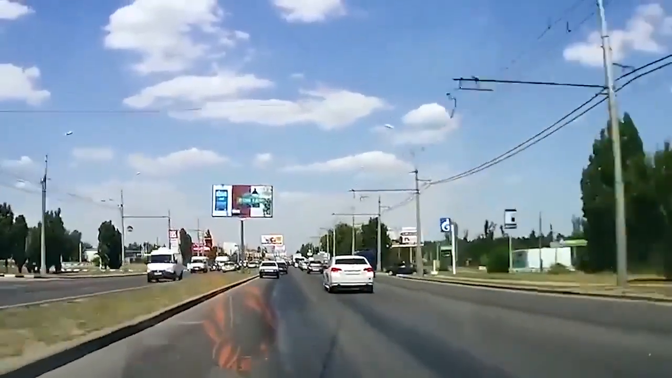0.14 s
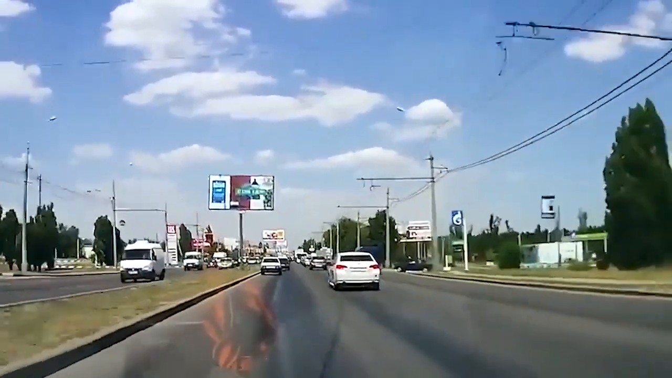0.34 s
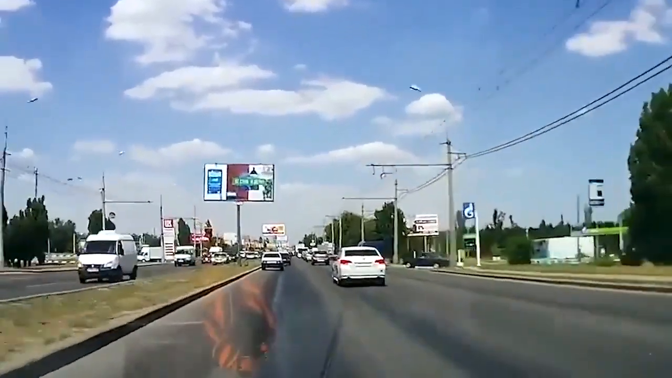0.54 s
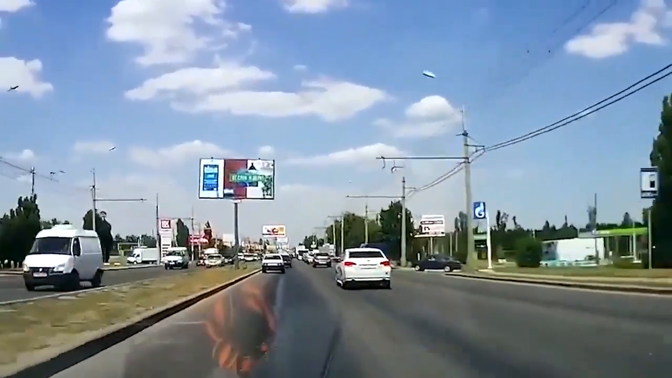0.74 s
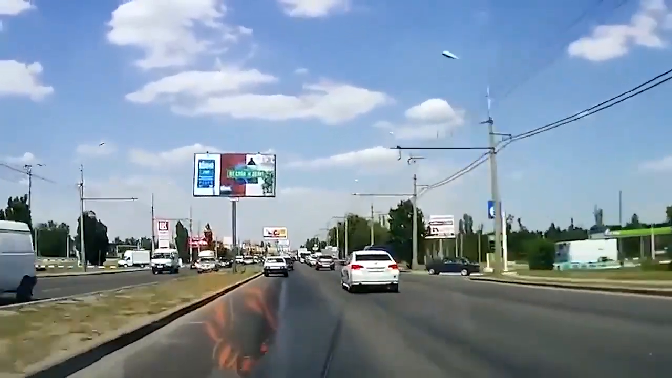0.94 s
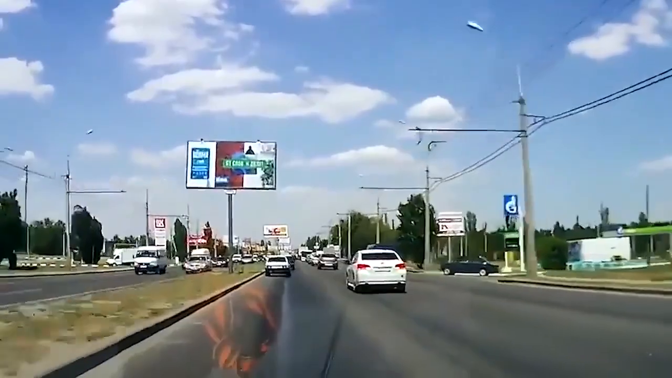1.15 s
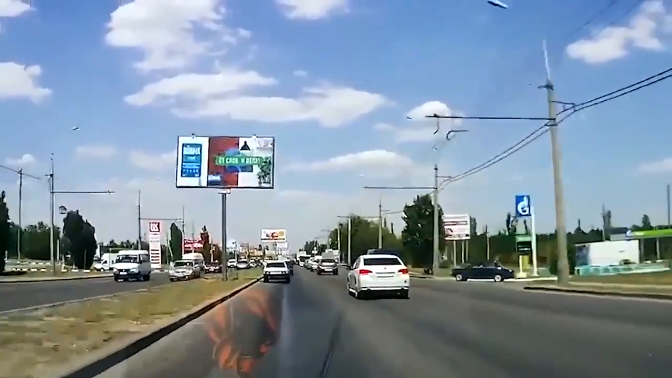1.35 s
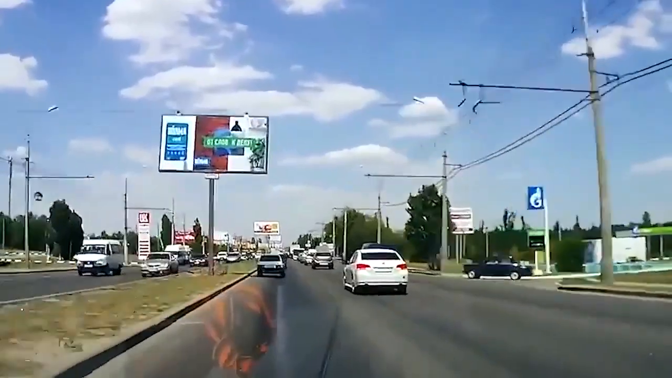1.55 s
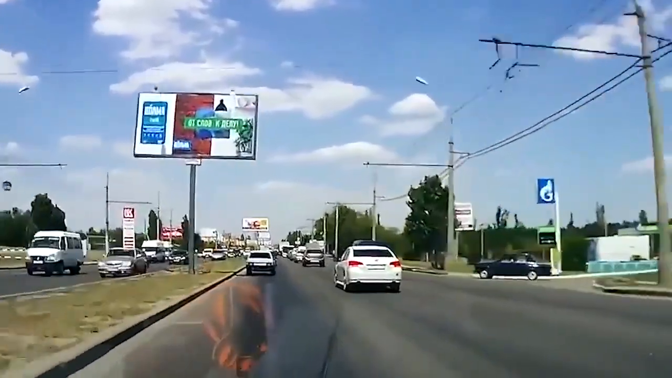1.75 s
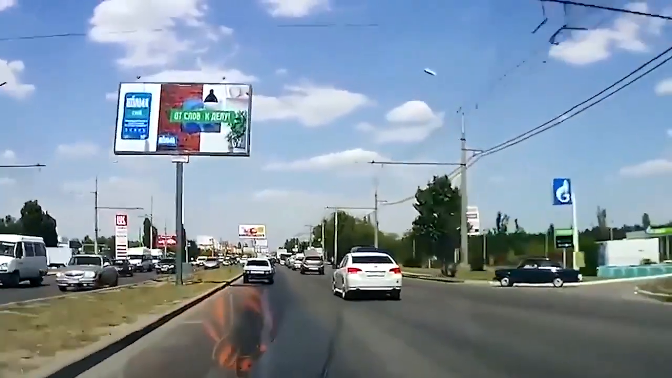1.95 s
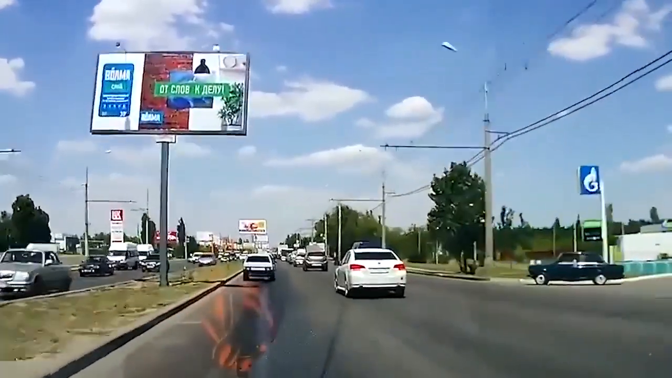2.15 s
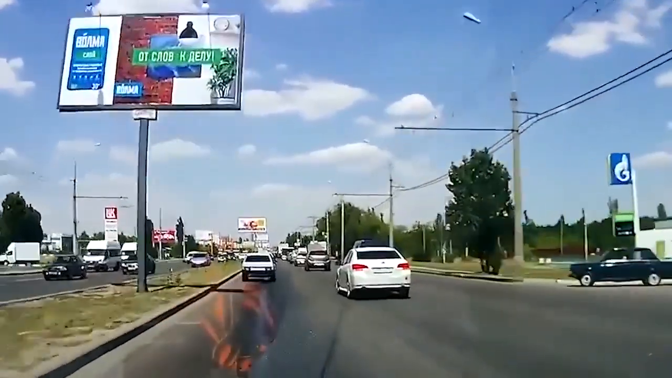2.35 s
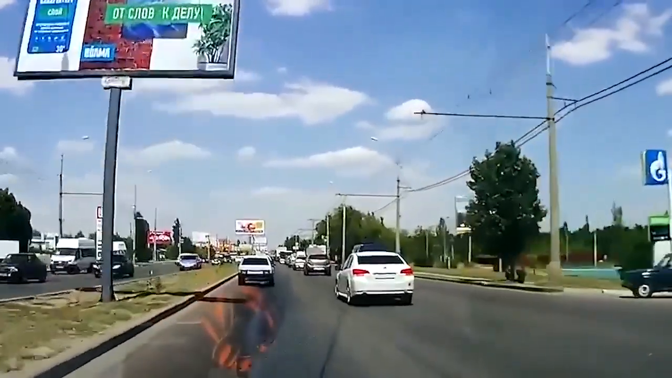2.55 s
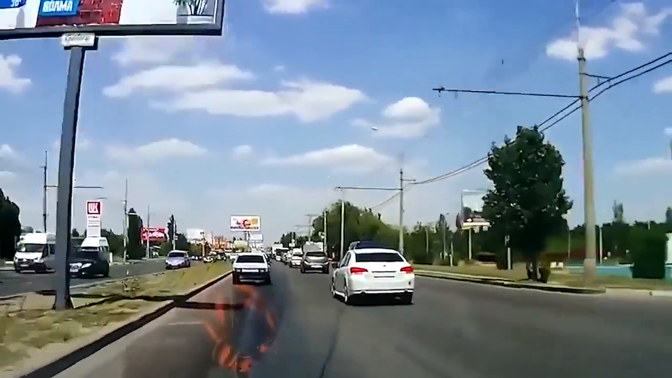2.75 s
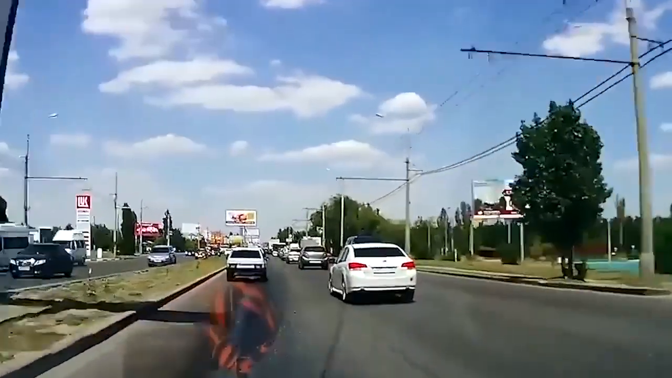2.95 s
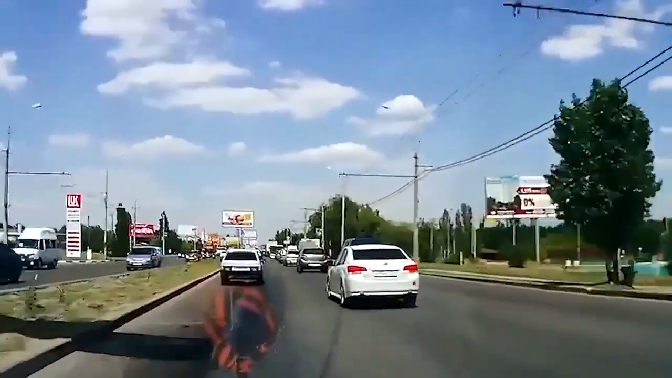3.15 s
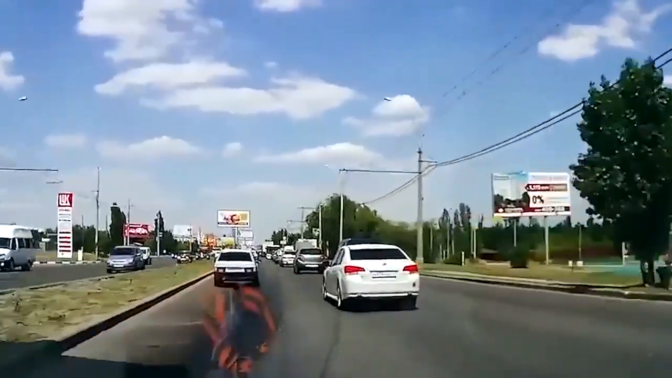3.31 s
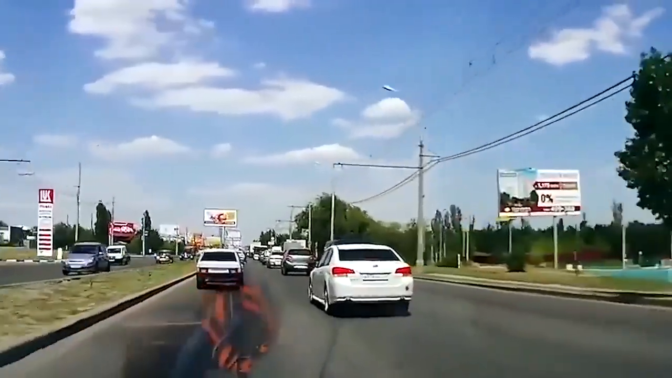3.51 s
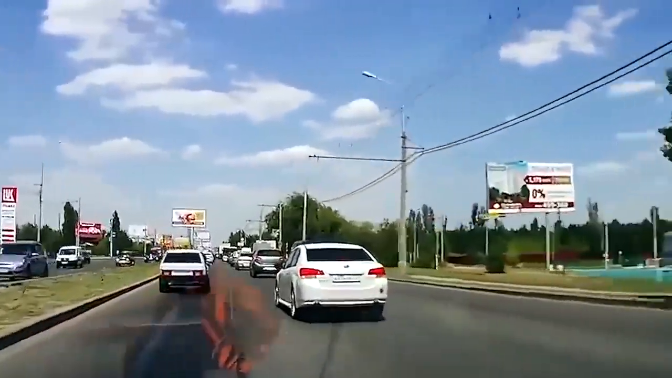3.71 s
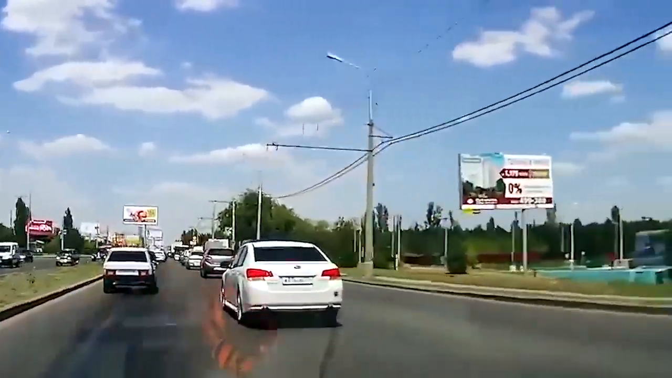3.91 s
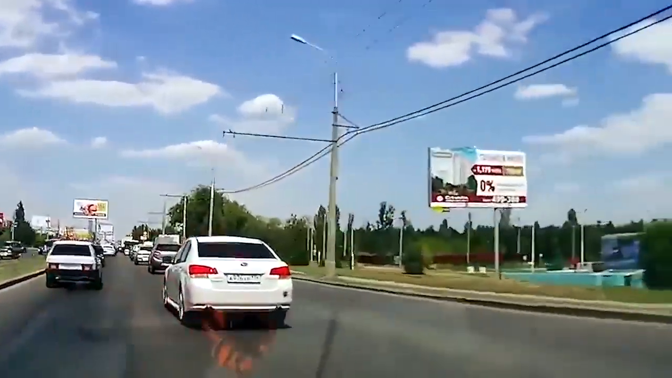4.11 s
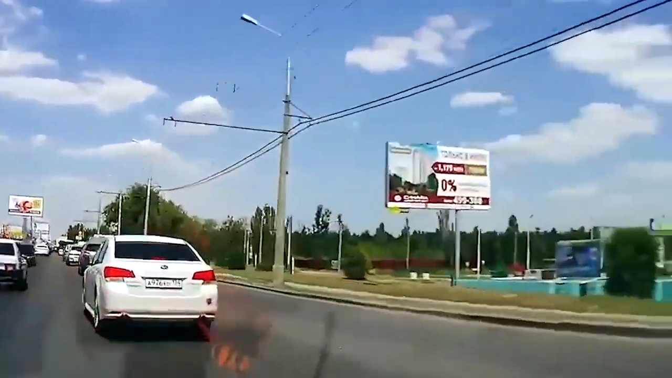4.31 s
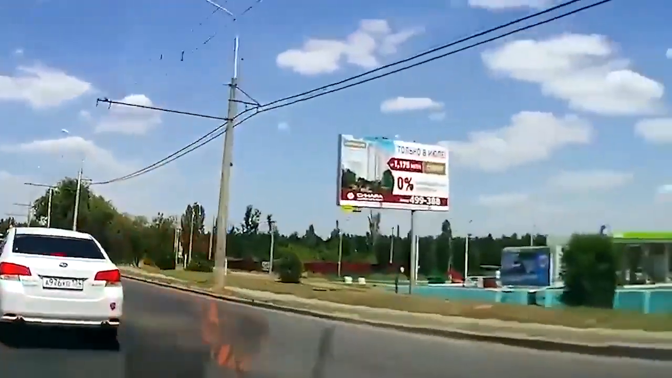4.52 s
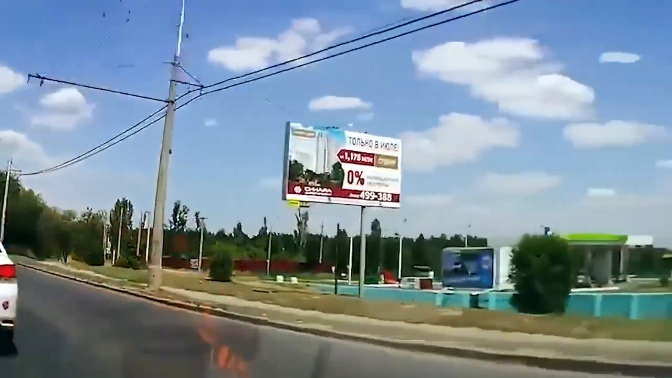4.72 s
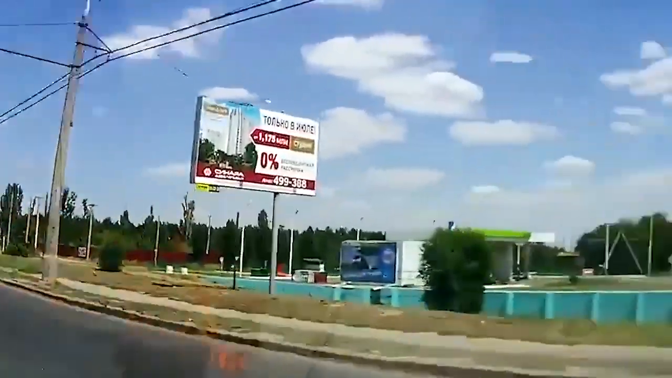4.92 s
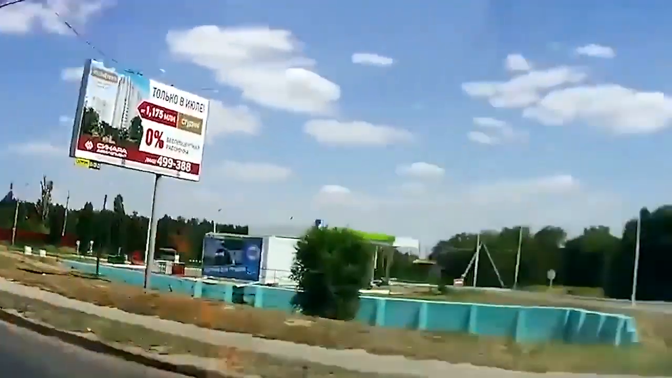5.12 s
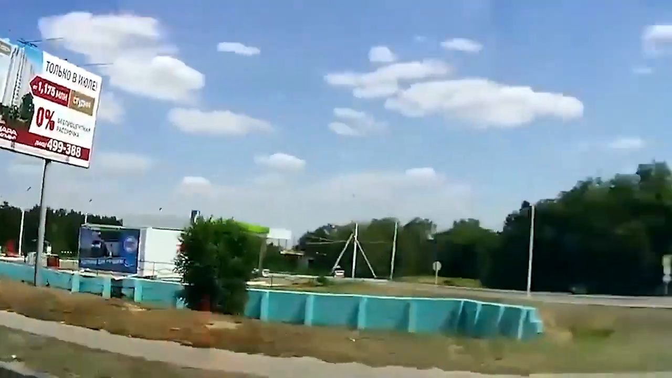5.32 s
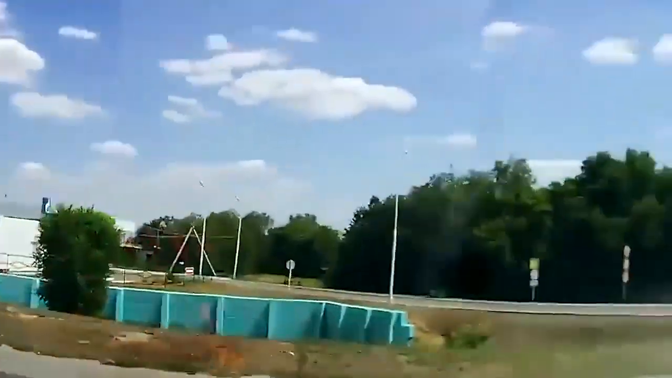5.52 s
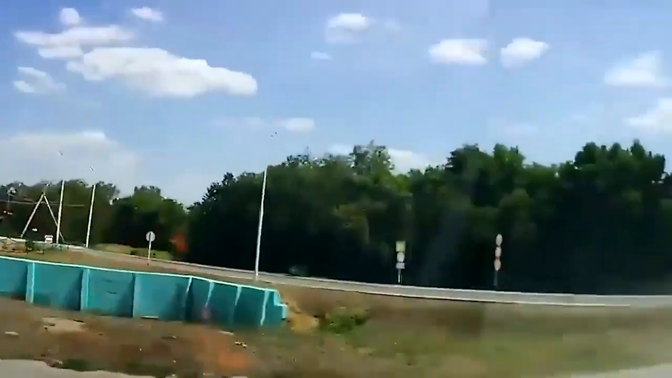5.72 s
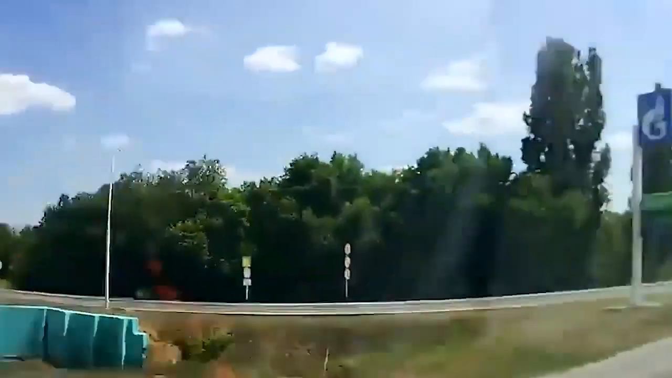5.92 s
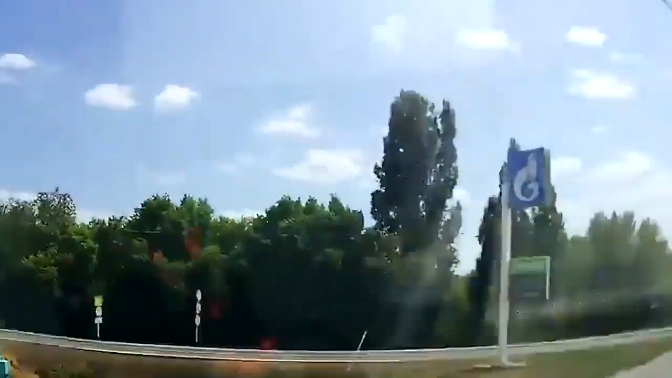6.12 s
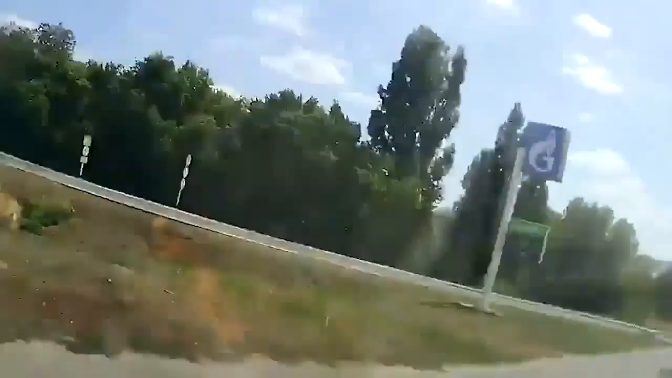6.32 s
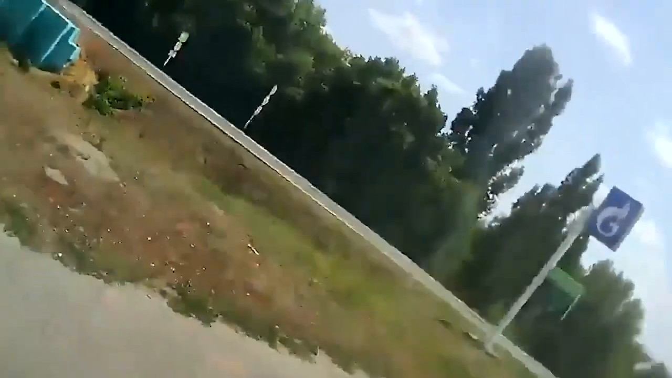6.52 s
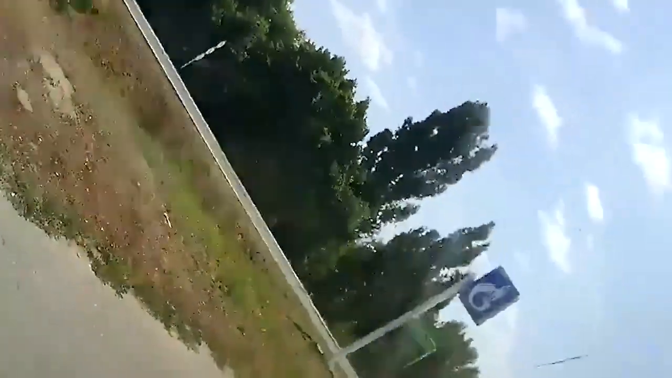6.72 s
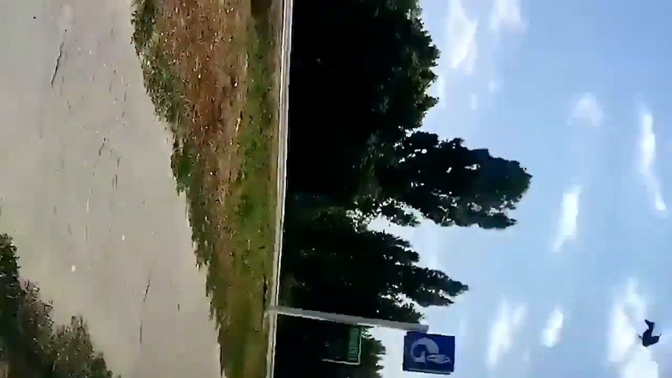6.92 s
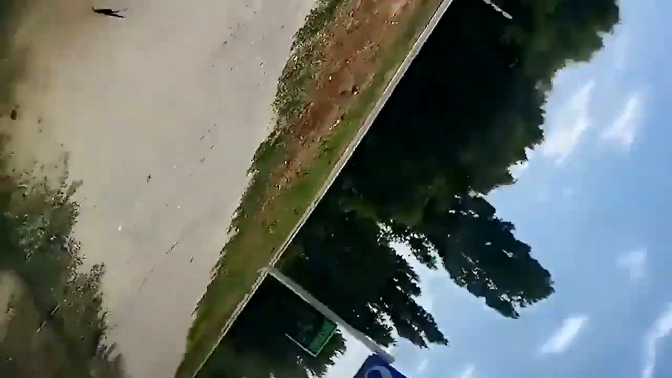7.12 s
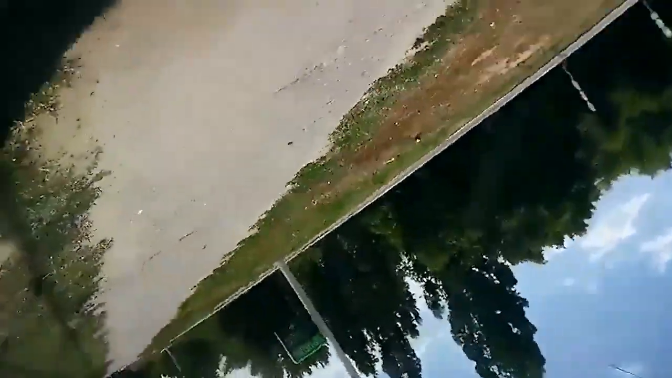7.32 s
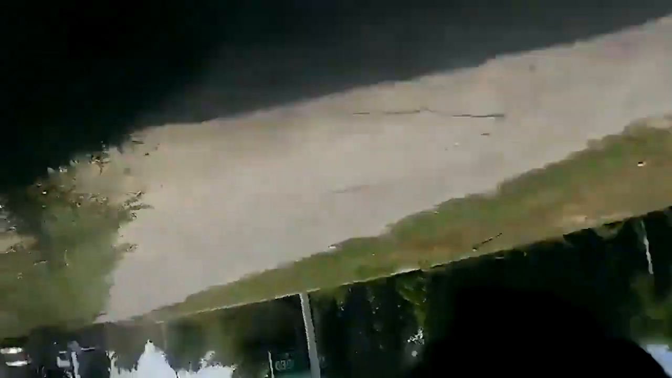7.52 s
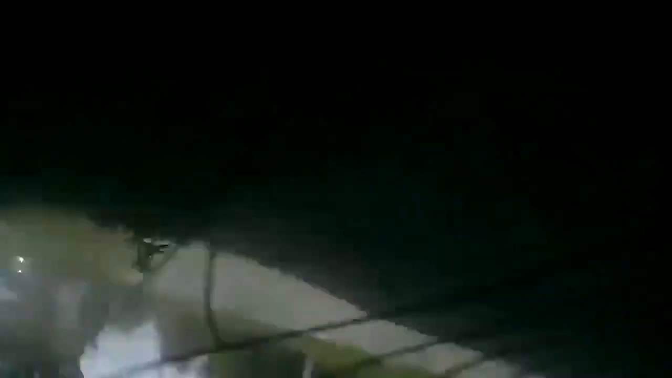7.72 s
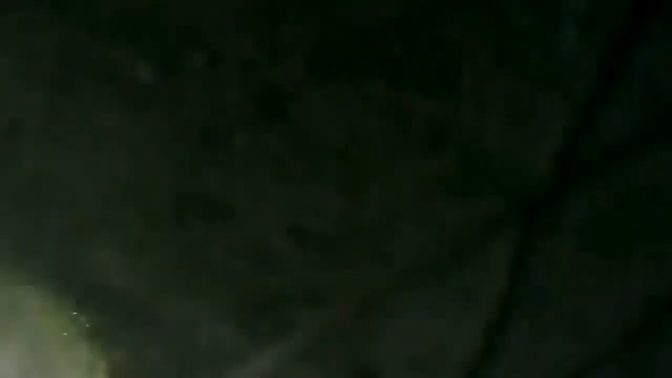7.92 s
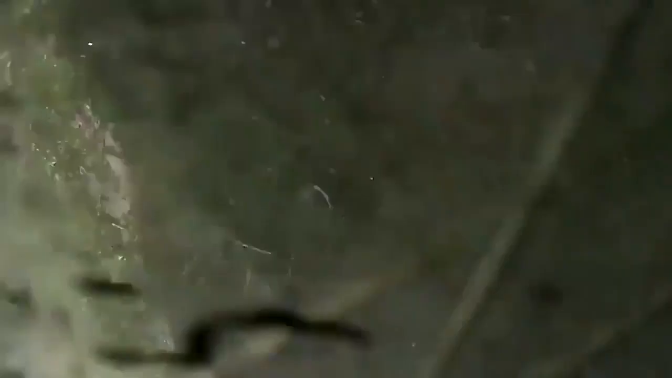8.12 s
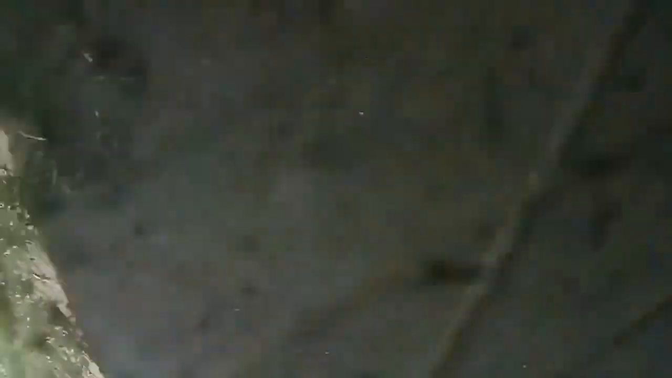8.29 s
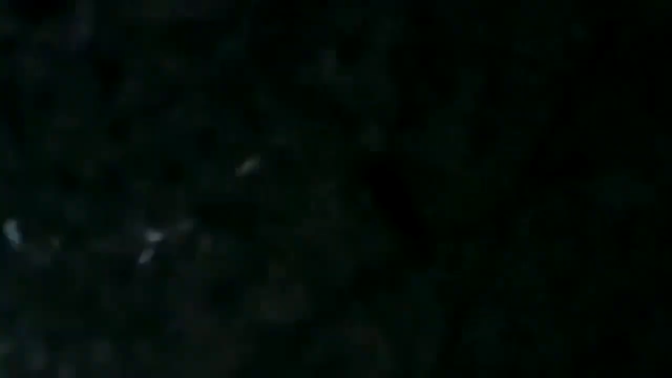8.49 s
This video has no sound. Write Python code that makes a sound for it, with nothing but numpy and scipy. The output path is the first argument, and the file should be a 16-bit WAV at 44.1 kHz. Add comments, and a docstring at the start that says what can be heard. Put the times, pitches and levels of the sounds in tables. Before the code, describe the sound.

A car interior at speed, low and rumbling, with muffled bumps and airy tread hiss. The tyres lose grip and squeal roughly, rising and falling in short surges, while trim rattles faintly. Two groups of dull body blows end the skid. A brief quieter groaning gap leads into a rapid rollover pile-up of bangs, buckling panels, clanking metal, debris and splintering glass, close and overloaded.

```python
"""Inside a car at speed: the body booms on its springs and the tyres roar, both from filtered noise.
It swerves and skids, with wavering harmonic tones for the squealing tyres, leaves the road and rolls over.
Decaying noise and panel modes make the blows on the shell; random contacts make the scraping metal;
short noise bursts make the breaking glass. A small dashboard microphone overloads on loud peaks."""
import sys
import numpy as np
from scipy import signal
from scipy.fft import rfft, irfft, next_fast_len
from scipy.io import wavfile
from scipy.ndimage import map_coordinates

SR = 44100
rng = np.random.default_rng(int(sys.argv[2]) if len(sys.argv) > 2 else 0)


def log_audio(samples):
    """Write samples as a 16-bit WAV file to the path given in sys.argv[1]."""
    # one column per channel
    frames = np.atleast_2d(samples).T
    # limit to full scale, then quantise
    limited = np.clip(frames, -1, 1)
    pcm = np.round(limited * 32767).astype(np.int16)
    wavfile.write(sys.argv[1], SR, pcm)


N = 377055
TIME = np.arange(N) / SR

# Table levels are relative: each layer may have its own trim in the mix.
# how hard the body is shaken: t/s, body boom level/dB, cabin drone level/dB
RIDE = [(0, -15.5, -23.5), (.5, -19.5, -28), (1.1, -17, -25.5), (1.7, -19.5, -28.5), (2.4, -18, -25),
        (3.1, -22, -23.5), (4.1, -18.5, -23.5), (4.7, -19, -27.5), (5.08, -14.5, -20.5), (5.8, -11.5, -21),
        (5.97, -19.5, -28), (6.3, -13, -22.5), (6.55, -11.5, -18), (6.76, -12.5, -22), (6.87, -18, -31),
        (7.3, -13.5, -23), (8.05, -12.5, -25), (8.18, -20, -25.5), (8.55, -15, -19)]
# rubber scrubbing sideways: t/s, level/dB
SCRUB = [(4.8, -41.5), (5.0, -37.5), (5.045, -29), (5.2, -31.5), (5.3, -31), (5.42, -21), (5.9, -22),
         (6.15, -25), (6.42, -23.5), (6.52, -36), (6.6, -64)]
# spectrum of the cabin drone and thuds: f/Hz, density/dB per Hz
DRONE = [(35, -30.5), (58, 2.5), (76, -5), (92, -3.5), (115, -10.5), (140, -21), (200, -24), (300, -26),
         (500, -29.5), (800, -35.5), (2000, -67.5), (5000, -115)]
# bright spectrum of rattling trim and of the clicks on jolts: f/Hz, density/dB per Hz
BRIGHT = [(1500, -20), (3500, 0.5), (5200, -2), (6500, -12), (8500, -10), (14000, -30.5)]
# spectrum of scraping and clanking metal: f/Hz, density/dB per Hz
SCRAPE = [(250, -21.5), (550, 0), (800, 1.5), (1100, -1.5), (1600, -2.5), (2100, -11.5), (2700, -8.5),
          (3400, -24), (4800, -19.5), (6200, -30.5), (15000, -36)]
# spectrum of breaking and dragged glass: f/Hz, density/dB per Hz
SHARDS = [(500, 0.5), (1500, -1), (2700, 3), (3300, -2.5), (4000, -0.5), (4800, 2), (6200, -9),
          (8400, -7.5), (11000, -14.5), (15000, -20)]


def amp(db):
    """Decibels to gain."""
    return 10 ** (np.asarray(db) / 20)


def unit(x):
    """Scale to rms 1."""
    return x / np.sqrt(np.mean(x ** 2) + 1e-20)


def level(rows, column=1):
    """Gain per sample from a dB column; it fades at 130 dB/s outside its rows."""
    s, db = np.transpose(rows)[[0, column]]
    outside = np.abs(TIME - np.clip(TIME, s[0], s[-1]))
    return amp(np.interp(TIME, s, db) - 130 * outside)


def envelope(s, length, attack, t60, t=TIME):
    """Gain at the times t: rise from s, hold until s + length, die away."""
    rise = np.clip((t - s) / attack, 0, 1)
    return rise * amp(-60 * np.maximum(t - s - length, 0) / t60)


def wobble(rate, size=N):
    """A smooth random curve, rate knots a second."""
    steps = np.arange(0, size * rate / SR + 1, 1 / 4)
    knots = rng.standard_normal(int(N * rate / SR) + 4)
    curve = map_coordinates(knots, [steps])
    return np.interp(TIME[:size] * rate, steps, curve)


def colour(x, points):
    """Causal minimum-phase filter through (Hz, dB) points."""
    size = 2 * next_fast_len(len(x) // 2 + 4096)
    f, db = np.transpose(points)
    gain = amp(np.interp(np.log(np.fft.rfftfreq(size, 1 / SR) + 1), np.log(f), db))
    # folding the cepstrum forward makes the response causal
    cepstrum = irfft(np.log(gain + 1e-6))
    cepstrum[1:size // 2] *= 2
    cepstrum[size // 2 + 1:] = 0
    response = np.exp(rfft(cepstrum))
    return irfft(rfft(x, size) * response)[:len(x)]


def noise(points, size=N):
    """Coloured noise of rms 1."""
    return unit(colour(rng.standard_normal(size), points))


def grains(rate, spread_db, size=N):
    """Random tiny contacts of uneven strength, rate a second on average, rms 1."""
    unevenness = np.clip(rng.standard_normal(size), -2, 2)
    strength = rng.standard_normal(size) * amp(spread_db * unevenness)
    return unit(strength * (rng.random(size) < rate / SR))


def add(track, s, sound):
    """Mix a sound in at s seconds."""
    start = round(s * SR)
    track[start:start + len(sound)] += sound[:max(N - start, 0)]


def cabin(x, t60, wet_db):
    """Windows and trim throw back a dense, short cloud of reflections."""
    t = TIME[:SR // 6]
    tail = rng.standard_normal(len(t)) * amp(-60 * t / t60) * (t > .001)
    echo = signal.oaconvolve(x, tail / np.linalg.norm(tail))[:len(x)]
    return (x + amp(wet_db) * echo) / np.hypot(1, amp(wet_db))


def blows():
    """Each blow thumps the body and buckles a panel: tiny snaps, and a hollow ring that sags as metal gives."""
    # blows on the shell: t/s, crunch level/dB, crunch centre f/Hz, t60/s, ring level/dB, panel f/Hz
    strikes = [(6.05, -20, 225, 0.17, -25, 198), (6.088, -15, 420, .12, -23, 292),
               (6.385, -16, 300, 0.2, -20, 338), (6.435, -12.5, 260, 0.22, -15.5, 224.5),
               (6.677, -33, 647, .2, -38, 593), (6.77, -18.5, 697, 0.21, -25, 603),
               (6.85, -17, 960, 0.12, -23.5, 899), (6.973, -28, 650, .08, -29, 590),
               (7.077, -20.5, 700, 0.1, -21.5, 692), (7.088, -18, 800, .1, -10.5, 208),
               (7.118, -15.5, 1000, 0.08, -15, 1603), (7.13, -19, 1000, 0.071, -12.5, 1387),
               (7.146, -12.5, 596, .1, -10, 755), (7.162, -9, 597, 0.079, -12, 792),
               (7.282, -15, 760, 0.062, -19, 930), (7.318, -21, 810, 0.16, -28, 800),
               (7.377, -14, 750, .14, -15, 814), (7.425, -16, 640, 0.13, -18.5, 677),
               (7.561, -21.5, 1080, .13, -19.5, 984), (7.648, -14, 610, .11, -22.5, 630),
               (7.679, -7.5, 428, .05, -2, 493), (7.686, -19, 300, 0.16, -11, 171),
               (7.749, -1.5, 450, .055, -6, 539), (7.767, -16.5, 410, 0.086, -5, 404.5),
               (7.782, -2.5, 430, .035, -3.5, 504), (7.808, -11, 500, 0.082, -3.5, 286.4),
               (7.811, -15, 600, .07, -7, 635), (7.824, -8, 460, 0.053, -8, 438),
               (7.841, -14, 706, .08, -20, 478), (7.878, -2.5, 600, .04, -8.5, 645),
               (7.889, -7, 610, 0.028, -17.5, 433), (7.908, -4, 942, 0.1, -14, 1094),
               (7.94, -12, 600, .08, -13, 560), (7.98, -15, 600, .06, -15.5, 723),
               (8.005, -12, 581, .09, -17.5, 350), (8.069, -20.5, 700, 0.049, -19, 752),
               (8.133, -4, 803, 0.049, -6.5, 779), (8.225, -9.5, 796, .1, -14.5, 1022),
               (8.456, -14.5, 600, .12, -25, 595), (8.512, -17, 700, .14, -23, 739)]
    # crunch spectrum: multiple of the crunch centre, density/dB per Hz
    crunch_shape = [(.1, -15.5), (.3, -2), (.6, -0.5), (1, -2.5), (1.4, -2.5), (2, -9), (3.5, -19),
                    (7, -30.5), (25, -62.5)]
    # what a panel rings with: multiple of its pitch, level/dB
    modes = [(.62, -11), (1, 0), (1.6, -12), (2.3, -14.5)]
    buckle_sag, mode_scatter = .03, .08  # share of the pitch lost; random scatter in the exponent of the multiple
    track, t = np.zeros(N), TIME[:SR // 3]
    ratio, mode_db = np.transpose(modes)[:, :, None]
    for s, crunch_db, crunch_hz, t60, ring_db, ring_hz in strikes:
        spectrum = [(crunch_hz * multiple, gain) for multiple, gain in crunch_shape]
        crunch = unit(colour(grains(3000, 2.6, size=len(t)), spectrum))
        modes_hz = ring_hz * ratio ** (1 + mode_scatter * rng.standard_normal(ratio.shape))
        sagging_hz = modes_hz * (1 - buckle_sag * np.minimum(t / t60, 1))
        phase = 2 * np.pi * np.cumsum(sagging_hz, axis=1) / SR
        ring = unit((amp(mode_db) * np.sin(phase)).sum(axis=0))
        decay = amp(-60 * t / t60) * (1 - np.exp(-t / 0.00061))
        panel = (amp(crunch_db) * crunch + amp(ring_db) * ring) * decay
        thump_hz = rng.normal(135, 13.0)
        thump = np.sin(2 * np.pi * thump_hz * t) * amp(crunch_db - 5 - 60 * t / (2 * t60))
        add(track, s, panel + thump)
    return track


def slide_level(column):
    """Gain of one layer of the sliding shell; where slides overlap the strongest counts."""
    # from light brushing to a side digging in: t/s, length/s, groan level/dB, scrape level/dB, splinter level/dB
    slides = [(6.392, 0.089, -20.5, -37.5, -64), (6.509, 0.61, -31.5, -39.5, -57.5),
              (7.018, 0.61, -27.5, -30.5, -54), (7.06, 0.12, -23.5, -18.5, -41),
              (7.26, 0.2, -30, -26.5, -51), (7.436, 0.073, -28.5, -30, -46.5),
              (7.632, 0.11, -30.5, -37, -60.5), (7.733, 0.21, -25.5, -30, -47.5),
              (7.884, .23, -19, -23, -35.5), (8.124, 0.4, -27.5, -34, -47.5),
              (8.207, 0.044, -20, -26.5, -39), (8.479, 0.082, -17, -19.5, -40)]
    gains = [amp(row[column]) * envelope(row[0], row[1], attack=.02, t60=.24) for row in slides]
    return np.max(gains, axis=0)


def groan():
    """Panels groan as the shell judders over the ground: low noise of uneven strength."""
    # spectrum of groaning panels: f/Hz, density/dB per Hz
    groan_spectrum = [(70, -14.5), (110, -4.5), (140, 5.5), (190, -1.5), (290, 0), (400, -1), (600, -7),
                      (1000, -13.5), (3000, -60.5), (10000, -76.5)]
    return slide_level(2) * noise(groan_spectrum) * amp(5.1 * wobble(45))


def debris():
    """Stones and broken parts strike singly, each with a short ring at its own pitch. Rms 1."""
    strikes_per_s, spread_db = 90, 3.5
    typical_hz, spread_octaves, ring_cycles = 1100, .75, 35  # a ring falls 60 dB in ring_cycles
    track, t = np.zeros(N), TIME[:SR // 10]
    count = int(strikes_per_s * N / SR)
    times = rng.uniform(0, N / SR, count)
    scatter = np.clip(rng.standard_normal((count, 2)), -2, 2)
    for s, (strength, pitch) in zip(times, scatter):
        hz = typical_hz * 2 ** (spread_octaves * pitch)
        decay = amp(spread_db * strength - 60 * t * hz / ring_cycles)
        add(track, s, np.sin(2 * np.pi * hz * t) * decay)
    return unit(track)


def scrape():
    """Patches of the shell catch and let go on their own, each with its own ring, among flying debris."""
    patches = sum(cabin(grains(500, 7.1) * amp(2.2 * wobble(45)), t60=0.027, wet_db=6.0) for _ in range(4))
    return slide_level(3) * unit(unit(colour(patches, SCRAPE)) + amp(-3.5) * debris())


def splinters():
    """Dragged glass crunches in random contacts, and its splinters tinkle at fixed pitches."""
    # ringing glass splinters: f/Hz, level/dB
    glass_modes = [(2656, -4), (3253, -7), (3741, -4.5), (4060, -2.5), (4631, -5), (5018, -7), (5269, -9),
                   (5716, 4), (7160, -10), (7906, 1), (8932, -2)]
    tinkle_db, tinkle_t60 = -16, .08  # dB against the crunch, s
    t = TIME[:SR // 4]
    tinkle = np.zeros(N)
    for hz, db in glass_modes:
        ring = amp(db - 60 * t / tinkle_t60) * np.sin(2 * np.pi * hz * t)
        tinkle += signal.oaconvolve(grains(53, 3), ring)[:N]
    contacts = sum(cabin(grains(300, 3.7), t60=0.031, wet_db=4.0) for _ in range(4))
    return slide_level(4) * (unit(colour(contacts, SHARDS)) + amp(tinkle_db) * unit(tinkle))


def drag():
    """The shell judders over the ground: panels groan, grit crunches and glass splinters tinkle."""
    return amp(-2.0) * groan() + amp(0.5) * scrape() + amp(8.0) * splinters()


def cracks():
    """Glass and trim crack: a fracture runs for some milliseconds and stops, and the cabin rings faintly after."""
    # fractures: t/s, level/dB, length/s
    fractures = [(6.544, -38.5, 0.013), (6.775, -26.5, 0.026), (6.842, -35.5, 0.029), (7.077, -22, 0.018),
                 (7.171, -26.5, .014), (7.196, -22.5, 0.012), (7.224, -23.5, 0.0078), (7.464, -22, 0.015),
                 (7.483, -17.5, 0.0038), (7.638, -30.5, 0.011), (7.68, -15, 0.0068), (7.753, -16.5, 0.0087),
                 (7.781, -14, 0.0081), (7.882, -17, 0.013), (7.905, -21, 0.028), (8.003, -21.5, 0.028),
                 (8.098, -23.5, 0.0057), (8.132, -5.5, 0.013), (8.23, -16.5, .01), (8.421, -29.5, 0.011),
                 (8.522, -22.5, 0.024)]
    track, t = np.zeros(N), TIME[:SR // 4]
    for s, db, length in fractures:
        run = np.exp(-(t / length) ** 4)
        faint_ring = amp(-32.5 - 60 * t / 0.043)
        add(track, s, amp(db) * noise(SHARDS, size=len(t)) * (run + faint_ring))
    return amp(-3.0) * track


def clanks():
    """A loose metal part knocks: a crunch and ringing modes, mixed anew each time, sound and die away together."""
    # knocks: t/s, level/dB, t60/s
    knocks = [(7.192, -24.5, 0.044), (7.228, -25.5, 0.074), (7.294, -20.5, 0.037), (7.41, -21.5, 0.088),
              (7.465, -24, .09), (7.481, -22.5, 0.13), (7.505, -25.5, 0.12), (7.56, -16.5, 0.095),
              (8.117, -18, 0.046)]
    # what the parts ring with: f/Hz, level/dB
    metal_modes = [(985, 4), (1370, 1), (1720, -6), (2400, -3.5), (2790, -9), (4510, -20)]
    track, t = np.zeros(N), TIME[:SR // 5]
    hz, mode_db = np.transpose(metal_modes)[:, :, None]
    for s, db, t60 in knocks:
        detune, uneven = rng.standard_normal((2, len(metal_modes), 1))
        tones = np.sin(2 * np.pi * hz * (1 + 0.014 * detune) * t)
        ring = (amp(mode_db + 2 * uneven) * tones).sum(axis=0)
        ring = unit(ring)
        crunch = amp(-8.5) * noise(SCRAPE, size=len(t))
        add(track, s, amp(db - 60 * t / t60) * (ring + crunch))
    return track


def squeal(hz, rough, overtone_db):
    """Tread sticks and slips at a pitch that wavers with the grip; rough slipping jitters and flutters. Rms 1."""
    waver, jitter = .008, .035  # slow and fast unsteadiness, as shares of the pitch
    third_db = -9  # third harmonic against the second
    grabs_per_s, grab_db = 45, 3.5  # sliding tread grabs and lets go, so every squeal surges
    size = len(hz)
    pitch = hz * (1 + waver * wobble(40, size) + jitter * rough * wobble(320, size))
    phase = 2 * np.pi * np.cumsum(pitch) / SR
    overtones = np.sin(2 * phase) + amp(third_db) * np.sin(3 * phase)
    tone = np.sin(phase) + amp(overtone_db) * overtones
    flutter_db = 4 * rough * wobble(110, size)
    rasp = 1 + .27 * rough * wobble(700, size)
    surge_db = grab_db * np.tanh(wobble(grabs_per_s, size))
    return unit(tone * rasp * amp(flutter_db + surge_db))


def tyre(rows):
    """A loaded tyre swerves in pitch with its grip; chattering tread blocks lock into one note as it gets loud."""
    chatter_db, chatter_spread = -9, .065  # level; scatter as a share of the pitch
    lock_db = -23  # squeal level around which the blocks gradually lock
    s, hz, _ = np.transpose(rows)
    pitch, gain = np.interp(TIME, s, hz), level(rows, column=2)
    note = squeal(pitch, rough=.55, overtone_db=-25)
    blocks = (squeal(pitch * (1 + chatter_spread * wobble(60)), 1, -24) for _ in range(3))
    chatter = unit(sum(blocks))
    locked = gain / np.hypot(gain, amp(lock_db))
    return gain * (locked * note + amp(chatter_db) * (2 - locked ** 2) * chatter)


def screeches():
    """As a tyre loses its grip, each brief screech swells, slides from one pitch to another and dies."""
    # screeches: t/s, length/s, first f/Hz, last f/Hz, level/dB, overtone level/dB, roughness (1 = rough)
    slips = [(5.035, .09, 1120, 1085, -20.5, -18, .45), (5.033, .14, 1150, 950, -26.5, -16, 1.1),
             (5.247, .025, 1054, 1022, -20.5, -22, .5), (5.325, .04, 1440, 1467, -31, -26, .9),
             (5.36, .04, 760, 820, -29, -18, 1), (5.365, .1, 1155, 1090, -27, -27, 1.2),
             (5.49, .12, 1615, 1570, -28, -26, 1.2), (5.487, .086, 800, 850, -28, -18, 1.1),
             (5.544, .025, 1292, 1340, -19, -17, .5), (5.546, .086, 1130, 1070, -24, -22, 1.2),
             (5.21, .02, 950, 930, -27, -22, .6), (5.643, .04, 1877, 1900, -31, -20, .6),
             (5.723, .073, 1340, 1305, -22, -26, .35), (5.779, .26, 797, 660, -28, -23, 1.2),
             (5.71, .17, 1720, 1760, -29, -22, 1.2), (5.885, .04, 1700, 1660, -22, -21, .5),
             (5.92, .13, 1980, 1800, -33, -17, .7), (6.01, .024, 810, 850, -20, -25, 1),
             (6.11, .17, 1900, 1960, -33, -20, 1.3), (6.18, .1, 1560, 1640, -32, -12, 1.4),
             (6.13, .16, 985, 1015, -26, -16, .6), (6.28, .09, 1015, 930, -21, -22, .6),
             (6.308, .07, 1620, 1570, -27, -16, 1.1), (6.323, .03, 901, 890, -18, -20, .7),
             (6.293, .15, 1323, 1260, -30, -14, 1.3)]
    track, t = np.zeros(N), TIME[:SR // 2]
    for s, length, first_hz, last_hz, db, overtone_db, rough in slips:
        glide_hz = np.interp(t, [0, length], [first_hz, last_hz])
        tone = squeal(glide_hz, rough, overtone_db)
        add(track, s, amp(db) * envelope(0, length, attack=.02, t60=.14, t=t) * tone)
    return track


def scrub():
    """Rubber and grit scrub sideways over the road: dense random contacts of uneven strength."""
    # spectrum of scrubbing rubber: f/Hz, density/dB per Hz
    rubber = [(100, -15.5), (300, -5.5), (550, -10.5), (880, 6), (1150, 0), (1600, -4), (2200, -16),
              (2900, -17), (3500, -24.5), (5000, -25.5), (8000, -34), (10000, -43.5), (15000, -45)]
    return level(SCRUB) * unit(colour(grains(1500, 1.8), rubber)) * amp(3.35 * wobble(45))


def rattle():
    """Loose trim rattles along with the scrub: sparse random contacts."""
    return level(SCRUB) * unit(colour(grains(40, 3), BRIGHT))


def skid():
    """The tyres squeal over the scrub of rubber and grit, while loose trim rattles."""
    # the two loaded tyres, one table each: t/s, f/Hz, level/dB
    front = [(4.4, 940, -51), (4.55, 949, -34), (4.85, 933, -41), (5.21, 950, -31), (5.29, 940, -38),
             (5.35, 945, -27), (5.42, 900, -23.5), (5.46, 910, -31), (5.5, 960, -22), (5.535, 860, -29),
             (5.575, 880, -17.5), (5.615, 920, -29), (5.66, 940, -14), (5.69, 975, -19), (5.72, 905, -19),
             (5.8, 915, -22.5), (5.89, 910, -20), (5.915, 960, -13), (5.985, 950, -31), (6.02, 910, -19.5),
             (6.08, 940, -26), (6.135, 935, -17), (6.18, 925, -20), (6.22, 925, -12.5), (6.27, 915, -16),
             (6.33, 830, -18.5), (6.38, 785, -22), (6.42, 680, -26), (6.48, 650, -38)]
    rear = [(5.26, 1510, -38), (5.37, 1430, -23), (5.405, 1375, -16), (5.445, 1400, -34), (5.49, 1480, -25),
            (5.525, 1450, -19), (5.6, 1530, -26), (5.65, 1565, -23), (5.74, 1500, -22), (5.82, 1540, -24),
            (5.88, 1455, -19), (5.91, 1400, -30), (5.932, 1430, -22), (5.947, 1320, -14.5),
            (5.973, 1240, -16), (5.99, 1350, -20), (6.0, 1590, -20), (6.04, 1700, -22), (6.08, 1750, -44)]
    tyres = cabin(tyre(front) + tyre(rear) + screeches(), t60=.05, wet_db=-10)
    contact = amp(-0.5) * scrub() + amp(-29.5) * rattle()
    return tyres + cabin(contact, t60=0.061, wet_db=0.5)


def bumps():
    """Each jolt swings the body on its springs and thuds in the cabin, with a faint bright click."""
    # jolts from road, kerb and ground: t/s, body swing level/dB, cabin thud level/dB, click level/dB
    jolts = [(0.235, -17, -37, -50), (0.754, -6, -34, -44), (0.942, -7, -32, -50), (1.698, -5.5, -45, -45),
             (4.171, -17.5, -23.5, -48), (4.278, -8.5, -34, -44), (4.572, -33, -23.5, -48),
             (4.778, -8.5, -32, -47), (4.932, -20, -21, -47.5), (6.06, -8, -15, -34),
             (6.361, -23, -13, -36), (7.08, -13, -12.5, -35), (7.4, -9, -16, -42), (7.909, -12.5, -17, -35)]
    spring_hz, spring_t60 = 28, 0.32
    thud_s, thud_t60 = 0.045, 0.21  # hold and decay, s
    second_s, second_db = 0.028, -7  # a weaker click follows
    track, t = np.zeros(N), TIME[:SR // 3]
    for s, swing_db, thud_db, click_db in jolts:
        swing = np.sin(2 * np.pi * spring_hz * t) * amp(swing_db - 60 * t / spring_t60)
        thud = noise(DRONE, size=len(t)) * amp(thud_db - 60 * np.maximum(t - thud_s, 0) / thud_t60)
        click = noise(BRIGHT, size=len(t)) * amp(click_db - 7.5 - 60 * t / .12)
        add(track, s, swing + thud + click)
        add(track, s + second_s, amp(second_db) * click)
    return track


def body_boom():
    """The body booms on its springs: low noise with its swings evened out, then a random swell."""
    # spectrum of the boom: f/Hz, density/dB per Hz
    boom_spectrum = [(4, -23), (14, -7), (22, 0.5), (29, 0), (38, -1), (50, -10.5), (70, -24), (150, -79.5),
                     (600, -120)]
    boom = noise(boom_spectrum)
    # a resonance keeps a fairly even swing
    boom = unit(boom / (np.abs(signal.hilbert(boom)) + .5))
    return amp(-0.5) * level(RIDE) * boom * amp(2 * wobble(9))


def rolling_tyres():
    """The tread roars and hisses on the asphalt; the roar varies over its patches and joints."""
    # rolling tyres: t/s, roar level/dB, tread hiss level/dB
    roll = [(0, -32, -49.5), (.45, -29.7, -48.5), (1.05, -31.3, -49.5), (1.6, -33, -49.5), (2.1, -35, -53),
            (2.7, -35.7, -55.5), (3.3, -36.5, -57.5), (3.9, -36.3, -59), (4.6, -34, -49), (5.0, -34, -48),
            (6.0, -35, -50), (6.5, -41, -56), (7.0, -45, -60)]
    # spectra of the roar and of the hiss: f/Hz, density/dB per Hz
    roar_spectrum = [(100, -22.5), (250, -1), (400, -8), (600, 0), (800, -0.5), (930, 5), (1150, -4.5),
                     (1550, -6), (2000, -21), (2750, -27.5), (3400, -35.5), (4900, -37.5), (6000, -49),
                     (15000, -68)]
    hiss_spectrum = [(900, -24), (1900, 2.5), (2750, -3), (3400, -23), (4900, -19.5), (6000, -29),
                     (15000, -49)]
    roar = noise(roar_spectrum) * amp(0.8 * wobble(7.0) + 0.64 * wobble(70))
    return amp(0.08) * level(roll) * roar + level(roll, column=2) * noise(hiss_spectrum)


def floor_rumble():
    """The floor pan rumbles with the texture of the road: low noise of uneven strength."""
    # rumble: t/s, level/dB
    floor = [(0.1, -31.5), (.7, -39), (1.3, -37), (1.8, -41), (2.4, -39.5), (3.15, -35.5), (3.6, -34.5),
             (4.15, -31.5), (4.7, -40), (5.3, -27), (5.85, -33.5), (6.1, -26), (6.3, -31.5), (6.6, -25),
             (6.95, -33.5), (7.2, -29), (8.55, -35)]
    # spectrum of the floor pan: f/Hz, density/dB per Hz
    pan_spectrum = [(70, -29.5), (105, -3.5), (140, 3), (195, -3), (260, -13.5), (330, -8.5), (450, -22.5),
                    (1000, -56.5), (4000, -110)]
    return amp(-1.0) * level(floor) * noise(pan_spectrum) * amp(3.1 * wobble(12))


def cabin_drone():
    """The cabin drones as the body is shaken: low noise that swells at random."""
    return amp(-0.2) * level(RIDE, column=2) * noise(DRONE) * amp(1.8 * wobble(7.3))


def whine():
    """A thin, faint whine hangs in the cabin, its phase trembling."""
    return amp(-77.5) * np.sin(2 * np.pi * 7337 * TIME + .6 * wobble(60))


def scene():
    """Everything as it reaches the dashboard."""
    crash = blows() + drag() + cracks() + clanks()
    ride = bumps() + body_boom() + rolling_tyres() + floor_rumble() + cabin_drone()
    return (crash + skid() + ride + whine())[None]


def record(dry):
    """The microphone stage flattens loud peaks; nothing passes above its band limit."""
    ceiling, hardness, top_hz = .38, 5, 15400
    clipped = dry / (1 + np.abs(dry / ceiling) ** hardness) ** (1 / hardness)
    size = next_fast_len(N + 8192)
    in_band = np.fft.rfftfreq(size, 1 / SR) < top_hz
    return irfft(rfft(clipped, size) * in_band, size)[:, :N]


dry = scene()
out = record(dry)
log_audio(out)
```